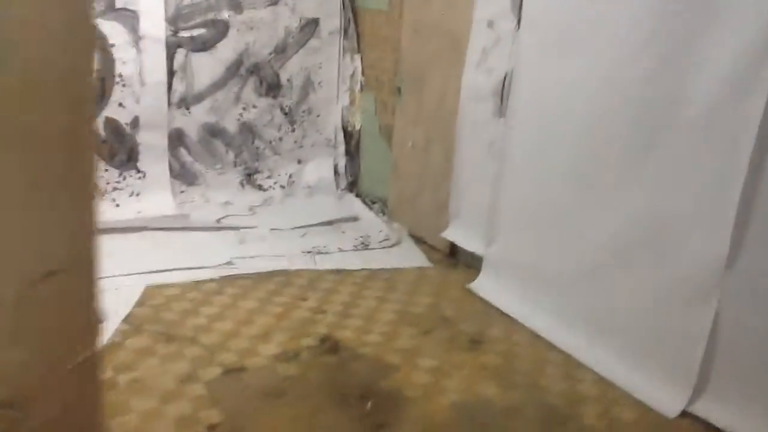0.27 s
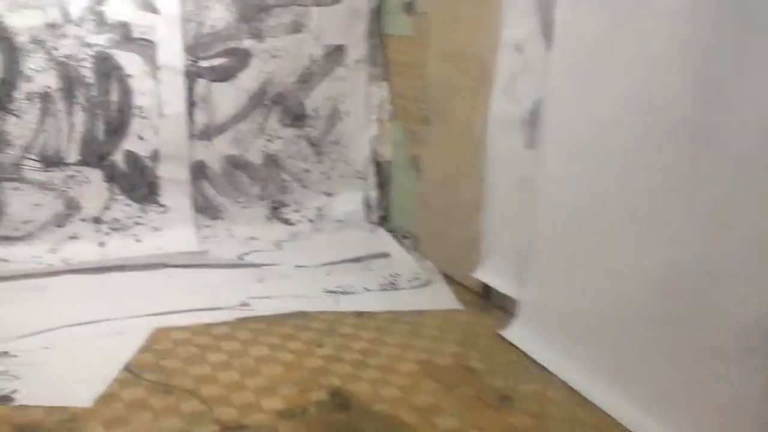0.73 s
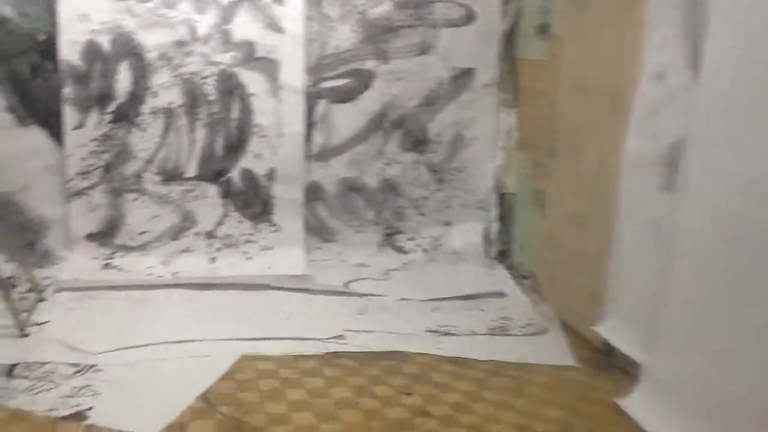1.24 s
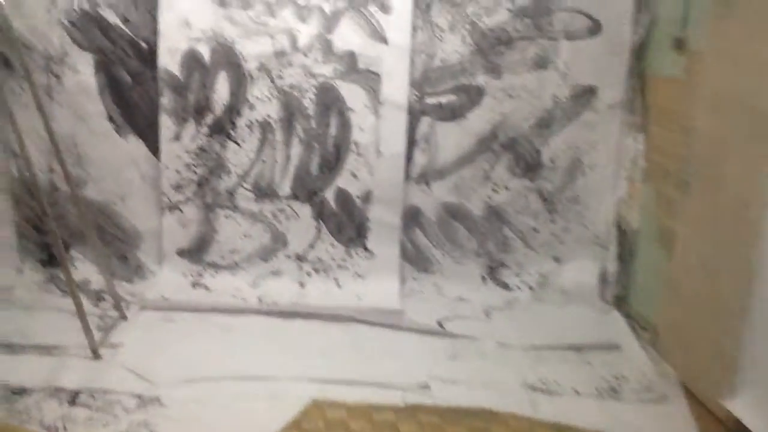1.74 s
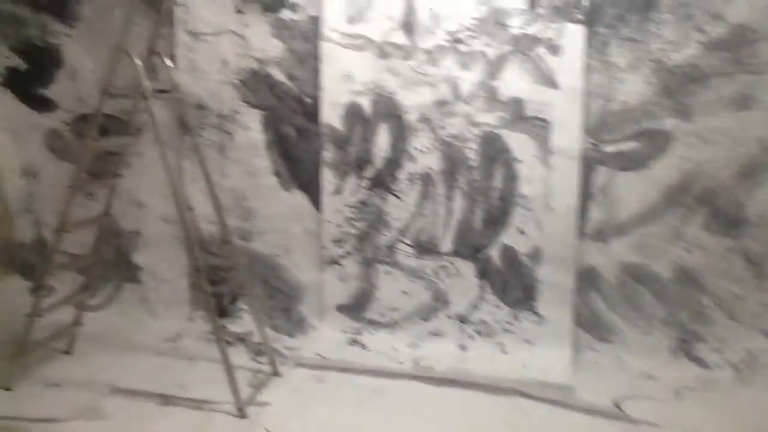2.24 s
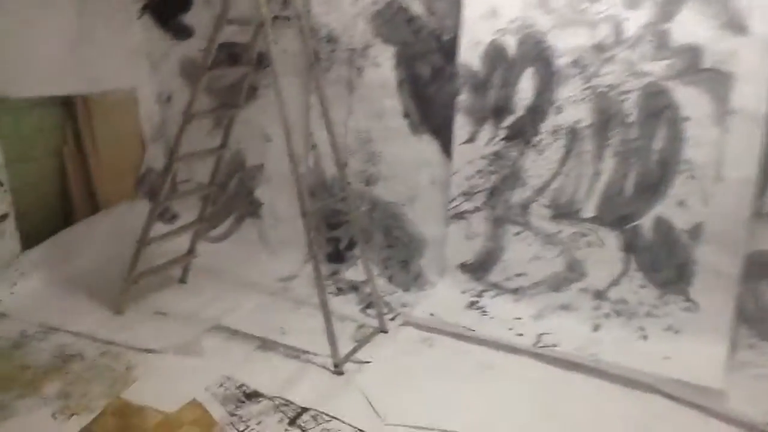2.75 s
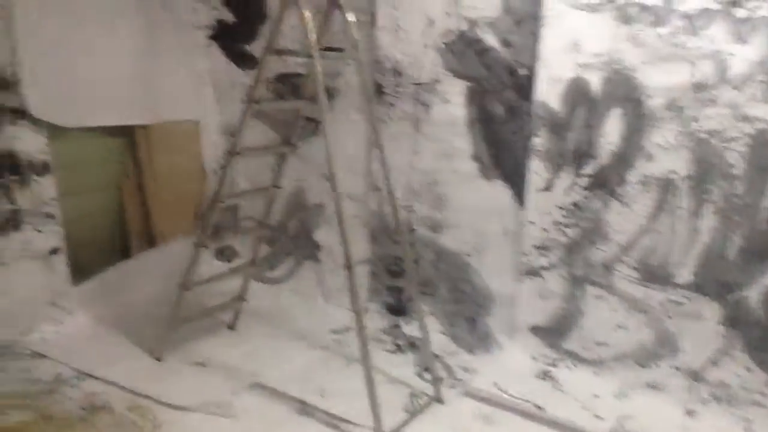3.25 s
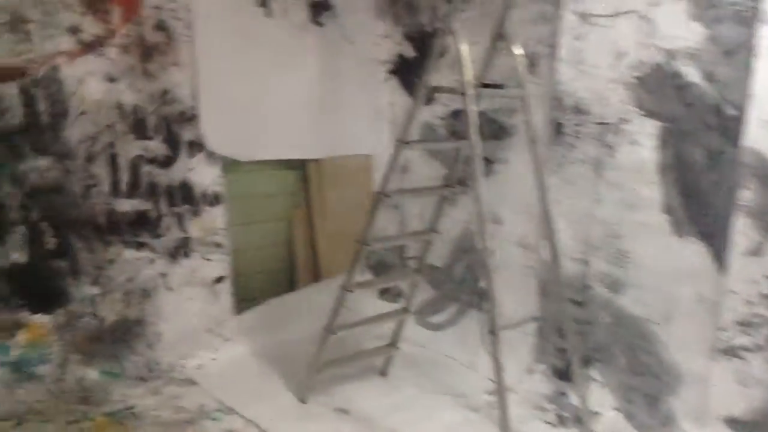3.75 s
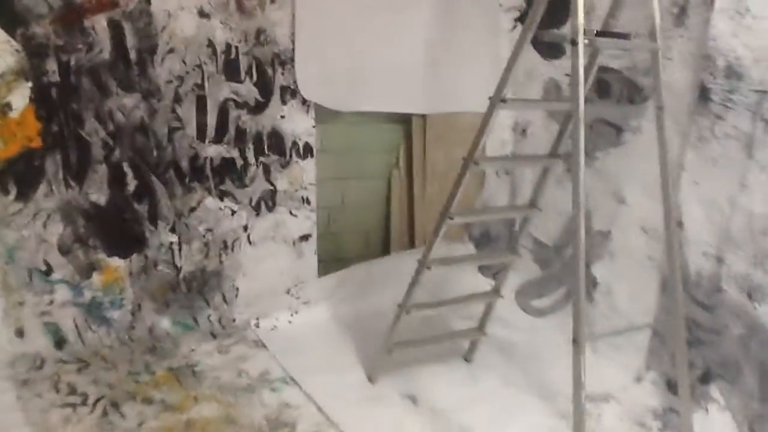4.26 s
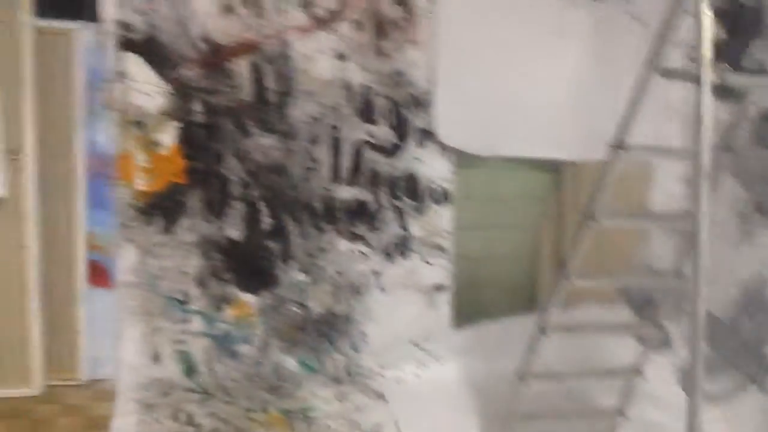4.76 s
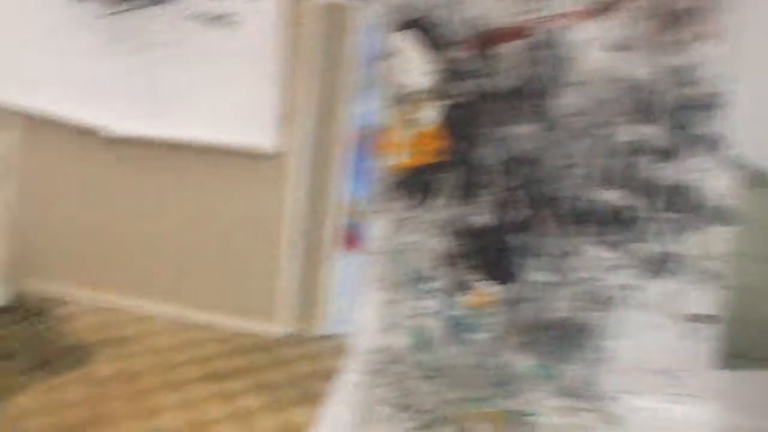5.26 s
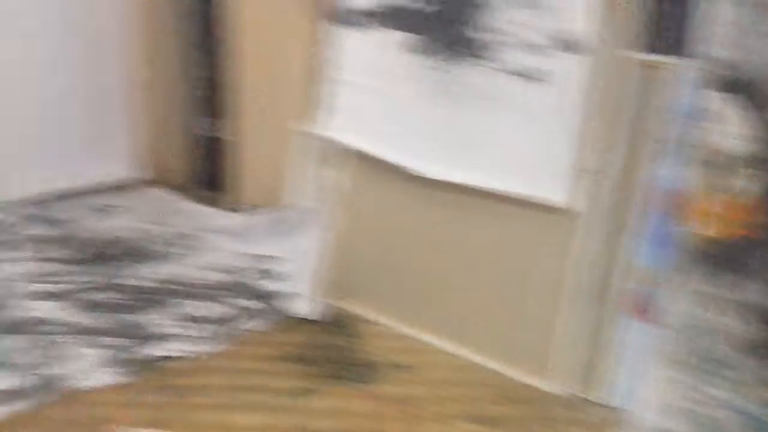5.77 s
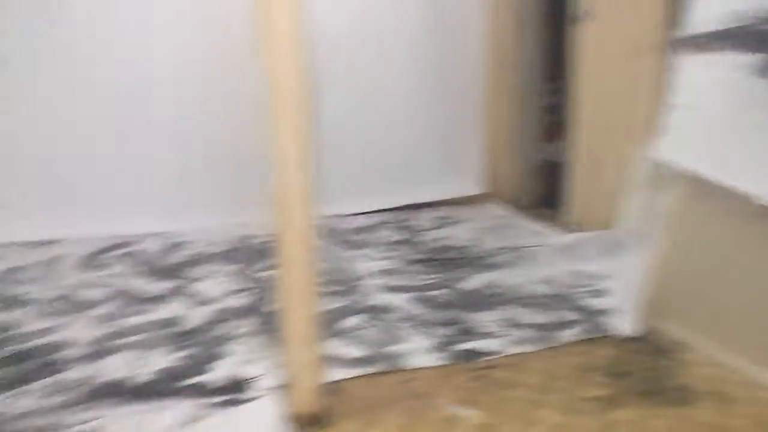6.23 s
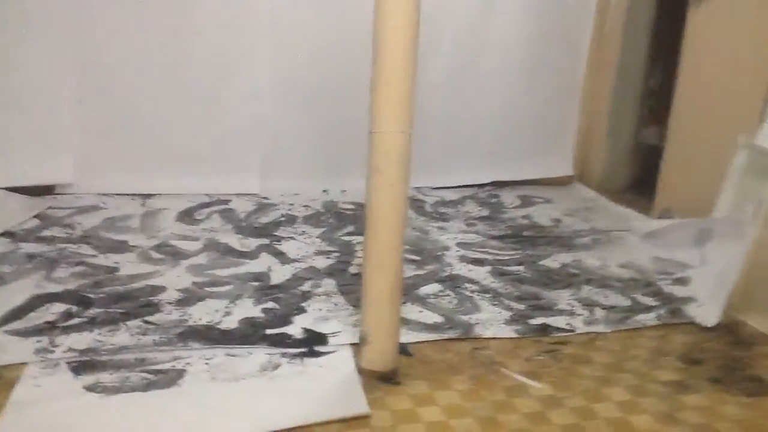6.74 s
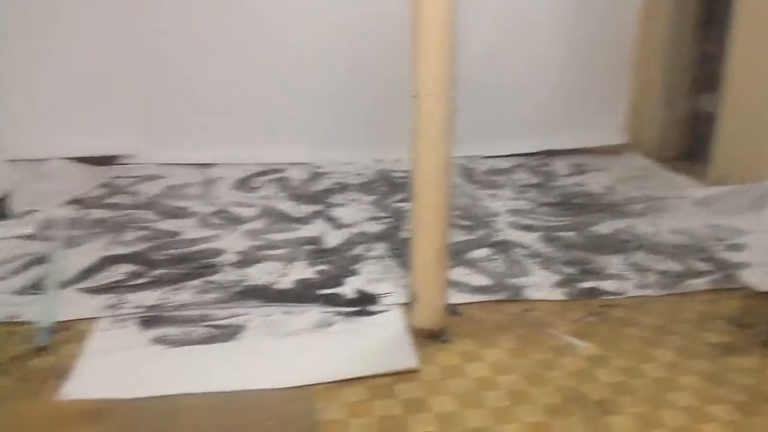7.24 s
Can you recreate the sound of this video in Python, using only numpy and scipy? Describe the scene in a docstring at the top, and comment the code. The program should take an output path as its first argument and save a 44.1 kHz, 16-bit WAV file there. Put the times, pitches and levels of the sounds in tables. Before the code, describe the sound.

A faint, steady room air lies under everything, with lumpy low rumble from fingers shifting on the phone. From 0 s a sole scuffs softly over paper; at 0.3 s a hard plastic clack rings with a little metal, and another follows at 0.8 s amid scratches. Thuds at about 1 s lead into gritty scrapes and papery flicks at 1.3-2.2 s. Hollow footfalls come at 2.3 s and a sharp cluster at 2.75 s. It is sparser until a creak at 3.56 s, then thumps and a knock near 4.05 s. From 4.6 to 5.5 s heavy thuds, clacks and chatter crowd together. Around 5.9-6.05 s comes the strongest jolt, with bright clacks, a tiny high squeak and a metallic ring. Softer bumps and scuffs continue, with a creak at 6.9 s and a last clack at 7.2 s. Bare walls add a short echo.

```python
"""Scuffs and soft thumps come first, then a hard clack: someone walks across a bare studio, holding a phone.
Feet set the wooden floor booming; soles scrape, scratch and hiss over paper, and squeak once.
Hard jolts make the phone clack and chatter; it also creaks in the hand, and a small metal part rings.
Thumps, clacks and rings mix decaying tones with shaped noise; scuffs and the room's echo are shaped noise.
"""
import sys
import numpy as np
from scipy import signal
from scipy.fft import rfft, irfft
from scipy.io import wavfile

SR = 44100
rng = np.random.default_rng(int(sys.argv[2]) if len(sys.argv) > 2 else 0)


def to_wav(sig):
    """Store sig (one row per channel, or 1-D mono) as 16-bit WAV at the path in sys.argv[1].

    Samples outside -1..1 are clipped; the rate is SR.
    """
    pcm = np.clip(np.atleast_2d(sig), -1, 1) * 32767
    pcm = np.round(pcm).astype(np.int16)
    wavfile.write(sys.argv[1], SR, pcm.T)  # frames by channels


N = 330750
TIME = np.arange(N) / SR  # seconds through the whole scene
AGE = TIME[:SR // 2]  # seconds since a short sound began

# All event and colour levels are relative; most layers also have a gain of their own.
# quiet air of the room, as a noise colour: (frequency [Hz], level [dB])
AIR_COLOUR = [(30, -45), (64, -35), (113, -8.5), (253, -1), (320, -9), (2030, -23.5), (3590, -32.5),
              (15000, -39)]
AIR_DB = -51
# time the room takes to fade by 60 dB: (frequency [Hz], fade time [s])
ROOM_DECAY = [(125, 0.42), (300, 0.37), (1000, 0.61), (2500, 0.56), (6000, 0.44), (14000, 0.4)]
# grip noise in the phone's body: (frequency [Hz], level [dB])
GRIP_COLOUR = [(60, -51), (125, 0), (180, -7.5), (255, 2.5), (330, -5), (500, -11), (900, -21.5),
               (2000, -47)]
# rise and fall of the grip's rumble: (time [s], level [dB])
GRIP_LEVEL = [(0.0, -43), (0.4, -36), (0.62, -75), (0.96, -28.5), (1.21, -56), (1.6, -38), (1.96, -46.5),
              (3.49, -35), (4.07, -26), (4.32, -42.5), (4.68, -30), (4.8, -31.5), (5.78, -39), (6.1, -26.5),
              (6.5, -38.5), (7.29, -36), (7.5, -29)]

# scuffs of soles and clothes: (time [s], gritty slide [dB], fine paper hiss [dB], rise [s], fade [s])
SCUFFS = [(0.04, -43.5, -56.5, 0.028, 0.29), (0.665, -48.5, -53.5, 0.0056, 0.33),
          (0.712, -43, -52, 0.00075, 0.2), (0.758, -34.5, -59, 0.017, 0.11),
          (1.331, -43.5, -53.5, 0.024, 0.14), (1.497, -44, -68, 0.0029, 0.19),
          (1.933, -49, -83, 0.0009, 0.079), (1.978, -40.5, -54, 0.016, 0.18), (2.1, -44, -50, 0.033, 0.054),
          (2.166, -41.5, -49, 0.0025, 0.11), (2.691, -39.5, -52.5, 0.0019, 0.21),
          (2.82, -43, -66, 0.058, 0.13), (3.506, -49, -63, 0.0021, 0.042), (4.769, -41, -54.5, 0.011, 0.12),
          (5.828, -41, -57.5, 0.029, 0.17), (6.235, -44, -74, 0.006, 0.034),
          (6.414, -46, -67, 0.00087, 0.12), (6.594, -52.5, -61, 0.0012, 1),
          (6.768, -65, -46.5, .001, 0.0062), (7.085, -43.5, -54, 0.25, 0.14), (7.18, -37, -72, 0.087, 0.12)]
# colours of the gritty slide and of the paper's hiss: (frequency [Hz], level [dB])
SLIDE_COLOUR = [(60, -45), (130, 6), (350, 7), (900, 1), (1600, 5), (2500, -1), (4000, -9.5), (6500, -22),
                (12000, -53)]
HISS_COLOUR = [(800, -29), (2500, 4), (6000, 7), (9000, 4.5), (13000, 0), (16000, -8)]
# short scratches where a sole catches on the paper: (time [s], level [dB], centre [Hz])
SCRATCHES = [(0.0718, -33, 1560), (0.133, -34, 1000), (0.7087, -23, 1700), (0.774, -28, 1210),
             (1.36, -22, 1120), (1.503, -33, 2580), (1.5297, -33, 2380), (1.5536, -33, 2570),
             (1.934, -30.5, 1670), (1.976, -30, 1300), (2.0011, -30, 1160), (2.0787, -36, 2620),
             (2.85, -27, 1570)]

# pings of the jolted metal part: (time [s], lower tones [dB], upper tones [dB])
PINGS = [(.311, -24, -36.5), (.811, -37, -38), (3.584, -42, -51), (4.049, -36, -36), (4.657, -28, -39),
         (4.815, -34, -41), (5.24, -38, -46), (5.902, -37, -38), (6.002, -35, -39.5), (6.907, -39, -70)]
# its two families of tones: (frequency [Hz], level [dB], fade by 60 dB [s])
METAL_LOW = [(1658, -11, 0.17), (2019, 0, 0.25), (2288, -9, 0.26), (2541, -5, 0.22)]
METAL_HIGH = [(3284, 0, 0.42), (2684, -1, 0.11)]

# colours of the phone's case and of its hollow body: (frequency [Hz], level [dB])
CASE_COLOUR = [(900, -46), (1500, -7.5), (2000, 7.5), (2650, 3.5), (3400, -3.5), (4100, 2.5), (4800, -4.5),
               (5600, -3.5), (6800, -12.5), (10000, -18.5), (15500, -30.5)]
HOLLOW_COLOUR = [(150, -59), (350, 26.5), (560, -19), (690, 7.5), (820, 18), (950, 9), (1100, 18),
                 (1400, -5), (2200, -51)]
# ringing tones of the phone's holder: (frequency [Hz], level [dB], fade by 60 dB [s])
HOLDER_TONES = [(1071, -0.5, 0.074), (2023, -3, 0.11), (2199, -2, 0.21), (2687, 1.5, 0.13),
                (2940, 3, 0.054), (3840, -2, 0.062), (4295, -8, 0.045), (5460, 1, 0.046)]
# creaks of the case under the fingers:
# (time [s], length [s], level [dB], brightness [dB per octave], hollow body against the case [dB])
CREAKS = [(0.977, 0.023, -24, -6.5, 1), (3.5595, 0.034, -23, -4, -0.5), (4.013, 0.06, -22, -1.5, 1),
          (4.6824, 0.012, -14, -8.5, -5), (4.771, 0.06, -25.5, -4, 2), (6.899, 0.016, -26, -4, -1)]
# separate clicks as the case chatters on after a jolt: (time [s], level [dB])
CHATTER = [(0.3215, -20.5), (0.334, -21.5), (0.34, -28), (0.828, -25.5), (0.8423, -21), (3.584, -27.5),
           (2.765, -21), (4.654, -21), (4.707, -28), (5.2496, -22.5), (5.2587, -20.5), (5.269, -23),
           (6.018, -21), (7.3006, -33)]
# hard jolts, each a thud with a clack of the phone:
# (time [s], thud [dB], thud length [s], clack [dB], hollow body against the clack [dB],
#  clack decay [s], brightness [dB per octave])
JOLTS = [(0.3084, -26.5, 0.05, -12.5, 1, 0.014, -1.5), (0.8094, -28, 0.039, -15, -0.5, 0.02, 0),
         (1.063, -16.5, 0.035, -27, 5.5, 0.014, -0.5), (2.095, -54, .05, -26, -14, 0.05, -3.5),
         (2.75, -16.5, 0.069, -18, 5.5, 0.024, -3), (4.047, -16.5, 0.045, -23, 7, 0.01, 1),
         (4.2898, -28.5, 0.05, -41.5, 16.5, .018, -17), (4.6282, -20.5, 0.049, -16, -0.5, 0.025, 0.5),
         (4.647, -13, 0.11, -20.5, 12.5, 0.03, 1.5), (4.68, -14, 0.019, -24, -2, 0.024, 2),
         (4.798, -15.5, 0.043, -32, 8, .016, -1), (4.88, -20.5, 0.035, -25.5, 1, 0.042, -18),
         (4.921, -26.5, 0.055, -26.5, -1, 0.011, -8), (5.057, -21.5, 0.03, -24.5, -5.5, 0.019, -8.5),
         (5.2376, -22.5, 0.05, -15, -3.5, 0.028, 0), (5.42, -18, 0.067, -30.5, 2, 0.036, -10),
         (5.901, -24, 0.13, -13.5, -3.5, 0.012, 2.5), (5.95, -19, 0.062, -18, -4, 0.036, -20),
         (6.0009, -7, 0.039, -13, -25, 0.02, 0.5), (6.059, -32, 0.06, -21.5, -13, 0.032, -14),
         (7.185, -29, 0.021, -17, 2.5, 0.023, 0)]

# soft footfalls and bumps: (time [s], level [dB], length [s])
THUMPS = [(0.081, -26, 0.042), (0.243, -29.5, 0.052), (0.758, -23.5, 0.056), (0.904, -25, 0.054),
          (0.977, -28.5, 0.074), (1.096, -28, 0.033), (1.432, -23, 0.055), (2.053, -32.5, 0.039),
          (2.312, -16.5, 0.03), (2.492, -38.5, 0.031), (2.722, -17.5, 0.043), (2.73, -20, 0.016),
          (2.74, -12.5, 0.015), (2.986, -30.5, 0.032), (3.355, -31.5, 0.031), (3.57, -21.5, 0.046),
          (3.616, -23.5, 0.05), (3.737, -29.5, 0.033), (3.823, -39.5, 0.012), (3.901, -17, 0.055),
          (3.965, -21.5, 0.039), (3.984, -22, 0.049), (4.162, -24.5, 0.059), (4.426, -33.5, 0.03),
          (4.472, -29, 0.033), (4.714, -19, 0.017), (4.825, -21, 0.038), (4.857, -22, 0.036),
          (4.9, -18, 0.052), (4.957, -21, 0.058), (5.104, -23.5, 0.04), (5.18, -24.5, 0.041),
          (5.344, -29, 0.04), (5.494, -22, 0.077), (5.871, -23.5, 0.2), (6.025, -10.5, 0.023),
          (6.116, -19.5, 0.028), (6.219, -27.5, 0.13), (6.372, -28, 0.051), (6.555, -33, 0.012),
          (6.691, -29.5, 0.038), (6.89, -27.5, 0.046), (7.034, -23, 0.037), (7.113, -24, 0.15),
          (7.155, -18, 0.04), (7.34, -27.5, 0.059)]
# ringing tones of the floor boards: (frequency [Hz], level [dB], fade by 60 dB [s])
BOARD_TONES = [(130.5, -11, 0.33), (191.6, -10.5, 0.45), (246.9, 3.5, 0.25), (267.9, 2, 0.16),
               (353.6, -1, 0.089), (446.3, -6.5, 0.13), (609.5, -12, 0.13)]
# colours of the floor's boom and of the heel's knock: (frequency [Hz], level [dB])
BOOM_COLOUR = [(65, -110), (95, -78), (125, -5), (170, -3), (260, -2), (350, -5.5), (520, -8), (750, -32),
               (1500, -82)]
KNOCK_COLOUR = [(80, -26), (200, 5), (400, -1.5), (560, 7.5), (690, -1.5), (820, -1), (1100, -8.5),
                (1450, -11), (2200, -13), (3200, -32), (12000, -45)]


def undb(db):
    """Turn decibels into a multiplying gain."""
    return 10 ** (np.asarray(db) / 20)


def unit(x, size=None):
    """Scale to an average strength (rms) of 1, judged on the first size samples."""
    return x / np.sqrt(np.mean(x[:size] ** 2))


def along(points, hz):
    """Read values between (frequency, value) points, spacing frequencies by pitch as the ear does."""
    point_hz, value = np.transpose(points)
    return np.interp(np.log(np.maximum(hz, 1)), np.log(point_hz), value)


def tint(x, colour):
    """Strengthen or weaken each frequency to give a sound its colour, at rms 1."""
    hz = np.fft.rfftfreq(len(x), 1 / SR)
    return unit(irfft(rfft(x) * undb(along(colour, hz)), len(x)))


def noise(colour, size=len(AGE)):
    """Make random noise of a given colour, at rms 1."""
    return tint(rng.standard_normal(size), colour)


def walk(rate):
    """Wander at random between rate new values a second, with a spread near 1."""
    knots = rng.standard_normal(N // 100)
    return np.interp(TIME * rate, np.arange(len(knots)), knots)


def ring(tones, pitch, scatter_db, contact_s=0.00025):
    """A struck object rings in fading tones; their strengths and phases depend on the spot struck."""
    hz, db, t60 = np.transpose(tones)[:, :, None]
    gain = undb(db + scatter_db * rng.standard_normal(hz.shape))
    phase = 2 * np.pi * (hz * pitch * AGE + rng.random(hz.shape))
    fade = np.exp(-np.log(1000) * AGE / t60)
    build_up = 1 - np.exp(-AGE / contact_s)
    return build_up * np.sum(gain * fade * np.sin(phase), axis=0)


def add(track, s, sound):
    """Mix a sound into the track at time s, cutting it off at the end."""
    start = max(int(s * SR), 0)
    track[start:start + len(sound)] += sound[:N - start]


def quiet_air():
    """The air of the room is a faint, steady noise whose level wanders slightly."""
    return noise(AIR_COLOUR, size=N) * undb(AIR_DB + 0.63 * walk(4.51))


def room(x, wet_db=-9.0, gap_s=0.013):
    """Bare walls return a blur of echoes that builds up after a short gap and fades at a rate set by pitch."""
    t = TIME[:SR]
    hz = np.fft.rfftfreq(SR, 1 / SR)
    white = rfft(rng.standard_normal(SR))
    octave = np.round(np.log2(np.clip(hz, 125, 16000) / 125))
    tail = np.zeros(SR)
    for k in np.unique(octave):
        in_octave = octave == k
        t60 = along(ROOM_DECAY, np.mean(hz[in_octave]))
        tail += irfft(white * in_octave, SR) * np.exp(-np.log(1000) * t / t60)
    tail *= 1 - np.exp(-(t / gap_s) ** 2)
    return undb(wet_db) * signal.fftconvolve(x, tail / np.sqrt(SR / 20))[:N]


def grip(db=-9.5, lumpy_db=5):
    """Fingers shift on the phone: a faint, lumpy rumble that swells while the hand is restless."""
    swell_db = np.interp(TIME, *np.transpose(GRIP_LEVEL))
    lumps_db = lumpy_db * np.clip(walk(22), -2, 2)
    return noise(GRIP_COLOUR, size=N) * undb(db + swell_db + lumps_db)


def rubbing(grit_db=2.5, patchy_db=0.5, swell_db=3.0):
    """A sole lands and slides to rest, catching on grit in uneven bursts; the paper hisses under it."""
    slide_power, hiss_power, t = np.zeros(N), np.zeros(N), TIME[:SR]
    for s, coarse_db, fine_db, rise, fade in SCUFFS:
        speed = (1 - np.exp(-t / rise)) * np.exp(-t / fade)
        speed /= speed.max()
        # overlapping scuffs add in power
        add(slide_power, s, (undb(coarse_db) * speed) ** 2)
        add(hiss_power, s, (undb(fine_db) * speed) ** 2)

    # a new grain every 25 samples: most are small, a few large
    grain_sizes = np.minimum(rng.exponential(size=N // 25 + 1), 5.5)
    bursts = undb(grit_db * np.repeat(grain_sizes, 25)[:N])
    grit = tint(rng.standard_normal(N) * bursts, SLIDE_COLOUR)

    # the gritty slide favours now one octave, now another
    spectrum = rfft(grit)
    hz = np.fft.rfftfreq(N, 1 / SR)
    octave = np.round(np.log2(np.clip(hz, 400, 6400) / 400))
    patchy_grit = np.zeros(N)
    for k in np.unique(octave):
        band = irfft(spectrum * (octave == k), N)
        patchy_grit += band * undb(patchy_db * walk(55) + swell_db * walk(8.9))

    scrape = patchy_grit * np.sqrt(slide_power) * undb(0.72 * walk(83))
    hiss = tint(rng.standard_normal(N) * bursts, HISS_COLOUR)
    paper = hiss * np.sqrt(hiss_power) * undb(1.0 * walk(90))
    return scrape + paper


def scratches(db=-4, rise_s=0.0018, fade_s=0.0053, skirt_db=-15):
    """Each catch of the sole flicks the paper, which rustles briefly around one pitch."""
    out = np.zeros(N)
    flick = (1 - np.exp(-AGE / rise_s)) * np.exp(-AGE / fade_s)
    for s, level, hz in SCRATCHES:
        # weaker by skirt_db for each octave away from the centre
        colour = [(hz / 4, 2 * skirt_db), (hz / 2, skirt_db), (hz, 0),
                  (2 * hz, skirt_db), (8 * hz, 3 * skirt_db)]
        add(out, s, undb(level + db) * noise(colour) * flick)
    return out


def squeak(s=5.973, width_s=0.01, hz=4672, db=-19, octave_db=-24, waver=0.00244):
    """A rubber sole sticks and slips for an instant: a nearly pure tone with a weak octave."""
    phase = 2 * np.pi * np.cumsum(hz * (1 + waver * walk(250))) / SR
    swell = np.exp(-((TIME - s) / width_s) ** 2)
    return undb(db) * swell * (np.sin(phase) + undb(octave_db) * np.sin(2 * phase))


def pings():
    """The metal part rings in two families of tones; their balance depends on the jolt."""
    out = np.zeros(N)
    for s, low_db, high_db in PINGS:
        low = ring(METAL_LOW, pitch=1, scatter_db=0)
        high = ring(METAL_HIGH, pitch=1, scatter_db=0)
        add(out, s, undb(low_db) * low + undb(high_db) * high)
    return out


def tilted(db, hz, brightness):
    """Tilt a level towards treble or bass by brightness dB per octave, leaving 3000 Hz unchanged."""
    return db + brightness * np.log2(hz / 3000)


def case_noise(brightness):
    """The phone's case gives a noise of its own colour, made brighter or duller."""
    return noise([(hz, tilted(db, hz, brightness)) for hz, db in CASE_COLOUR])


def click(decay, brightness, hollow_db, holder_db=-2.0, hollow_s=0.011, squeeze=0.0061, snap_tilt_db=1.5):
    """On contact the case snaps brightly and dies away duller, its hollow knocks and the holder rings."""
    snap = case_noise(brightness + snap_tilt_db) * np.exp(-AGE / 0.0025)
    lingering = 0.43 * case_noise(brightness) * np.exp(-AGE / decay)
    knock = noise(HOLLOW_COLOUR) * np.exp(-AGE / hollow_s)
    pitch = 1 + squeeze * rng.standard_normal()  # the changing grip detunes the holder
    tones = [(hz, tilted(db, hz, brightness), t60) for hz, db, t60 in HOLDER_TONES]
    holder = ring(tones, pitch, scatter_db=0.5)

    contact = 1 - np.exp(-AGE / 0.0003)
    parts = [(0, snap + lingering), (hollow_db, knock), (holder_db, holder)]
    return sum(undb(db) * unit(part * contact, size=660) for db, part in parts)


def creaks(slip_db=-18.0, swell_db=1.0, slips_per_s=210, slip_s=0.0044):
    """The case sticks and slips in a quick uneven run of clicks that swells in the middle."""
    out = np.zeros(N)
    for s, length, db, brightness, hollow in CREAKS:
        gaps = np.exp(0.2 * rng.standard_normal(size=24)) / slips_per_s
        for at in np.cumsum(gaps) - gaps[0]:
            if at < length:
                level = db + slip_db + swell_db * np.sin(np.pi * at / length)
                add(out, s + at, undb(level) * click(slip_s, brightness, hollow))
    return out


def clacks(case_db=-14.0, chatter_db=-12, chatter_s=0.011):
    """A jolt clacks the phone; lighter, drier clicks follow as the case chatters."""
    out = np.zeros(N)
    for s, _, _, db, hollow, decay, brightness in JOLTS:
        add(out, s, undb(db + case_db) * click(decay, brightness, hollow))
    for s, db in CHATTER:
        add(out, s, undb(db + chatter_db) * click(chatter_s, brightness=-2, hollow_db=-6))
    return out


def thump(db, knock, length, rise_s=0.0041, loose=0.39, boom_db=-7.0, knock_db=-8, spread=0.036, joist_db=-19):
    """A foot makes the boards boom until its weight damps them; the heel knocks and the joists hum on."""
    pitch = 1 + spread * rng.standard_normal()  # each spot of the floor has its own stiffness
    damping = (1 - np.exp(-AGE / rise_s)) * np.exp(-(AGE / length) ** 2)
    boards = unit(ring(BOARD_TONES, pitch, scatter_db=3.0), size=1300) + loose * noise(BOOM_COLOUR)
    boom = unit(boards * damping, size=1300)

    heel_shape = (1 - np.exp(-AGE / 0.0011)) * np.exp(-2 * AGE / length)
    heel = unit(noise(KNOCK_COLOUR) * heel_shape, size=1300)
    joists = ring([(129.3, joist_db, 0.23)], pitch, scatter_db=7.0, contact_s=0.0099)
    return undb(db) * (undb(boom_db) * boom + undb(knock + knock_db) * heel + joists)


def footfalls(soft_knock_db=-13, hard_knock_db=-5):
    """Soft thumps mostly boom; the thud of a jolt has a stronger knock."""
    out = np.zeros(N)
    for s, db, length in THUMPS:
        add(out, s, thump(db, soft_knock_db, length))
    for s, thud_db, length, *_ in JOLTS:
        add(out, s, thump(thud_db, hard_knock_db, length))
    return out


def scene():
    """Steps, soles and phone sound in the room; its walls answer them over the quiet air."""
    soles = rubbing() + scratches() + squeak()
    phone = pings() + creaks() + clacks()
    steps = footfalls()
    # each source reaches the walls at its own strength
    to_walls = steps * undb(1.5) + phone * undb(-4.0) + soles * undb(-0.5)
    return (quiet_air() + room(to_walls) + grip() + soles + phone + steps)[None]


def record(dry):
    """The phone's microphone drops the deep bass steeply, and the top is cut."""
    bass_cut = signal.butter(5, 88, "highpass", fs=SR, output="sos")
    top_cut = signal.ellip(8, 0.2, 70, 15700, fs=SR, output="sos")
    return signal.sosfilt(top_cut, signal.sosfilt(bass_cut, dry))


dry = scene()
out = record(dry)
to_wav(out)
```